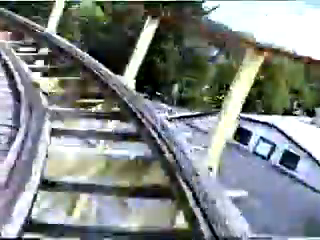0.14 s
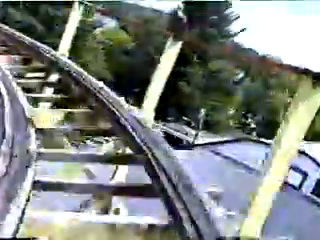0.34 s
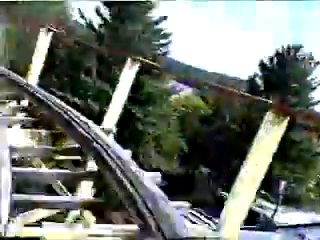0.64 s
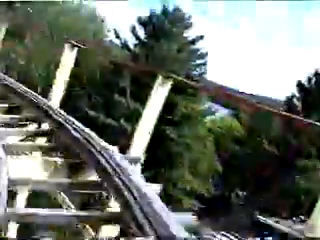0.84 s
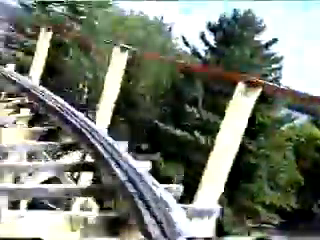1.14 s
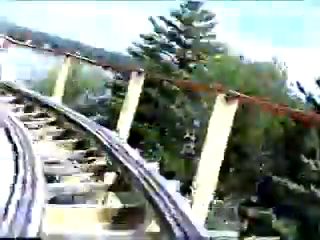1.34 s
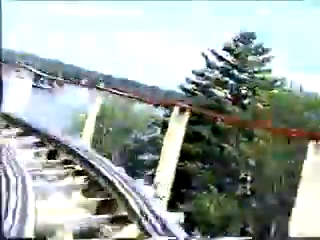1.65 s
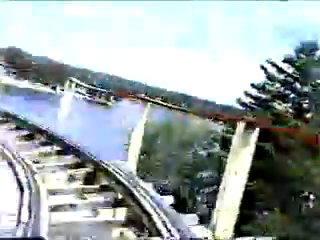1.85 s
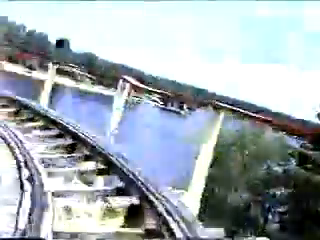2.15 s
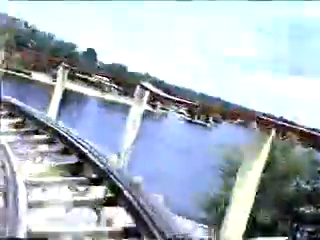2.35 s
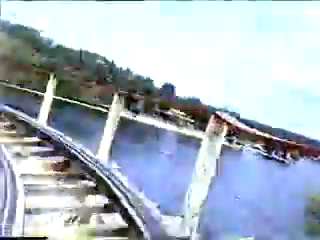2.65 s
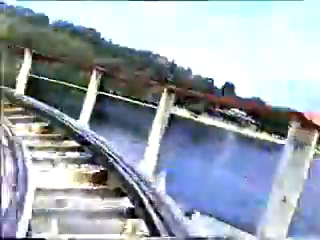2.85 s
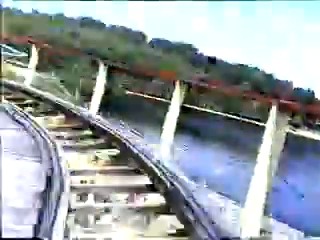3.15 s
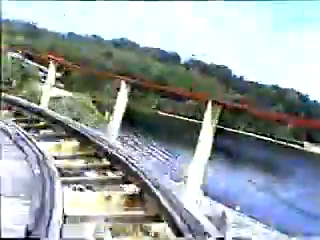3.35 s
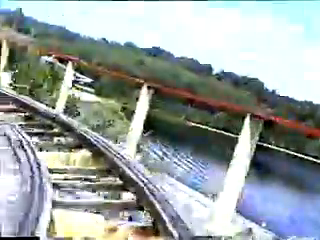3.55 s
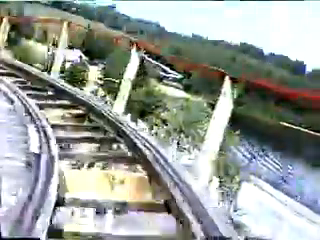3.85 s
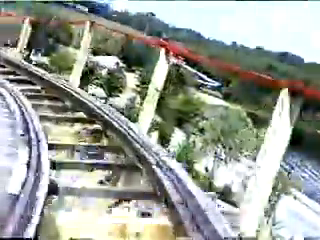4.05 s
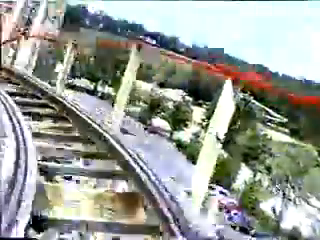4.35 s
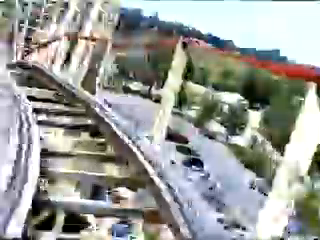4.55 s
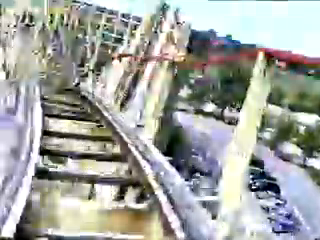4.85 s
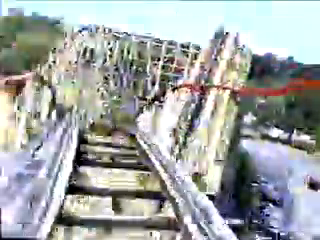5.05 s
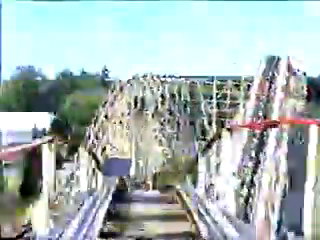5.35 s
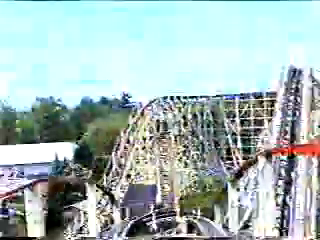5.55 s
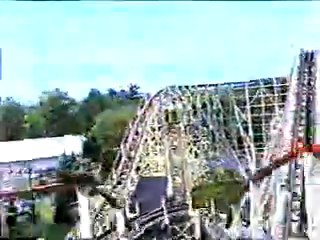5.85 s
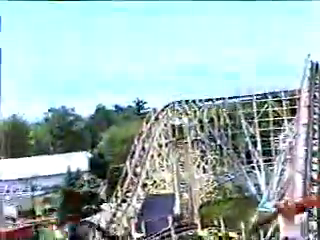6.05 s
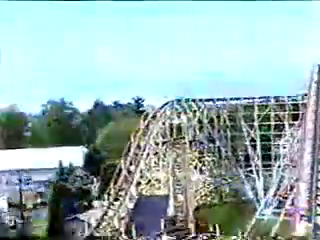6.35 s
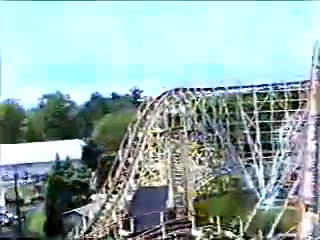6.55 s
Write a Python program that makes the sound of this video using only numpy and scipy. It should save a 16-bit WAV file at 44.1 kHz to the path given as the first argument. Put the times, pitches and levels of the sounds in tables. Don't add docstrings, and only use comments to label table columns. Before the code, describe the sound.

The ride is already in full motion at 0 s: steel wheels rumble roughly over wooden track, with hard, hollow jolts in the first half second and loose iron clanking above them. Around 1.2 s the rolling noise thins as the load lightens, and the ironwork rattles harder and brighter. By 1.8 s the fuller roar is back. From 2 to 4.3 s irregular bangs, quick rebounds and clacks keep coming, especially strong around 3.1 to 3.4 s, the roar dipping and surging. Jolts become sparser after about 4.5 s; at 5.0 to 5.3 s flanges give brief, unsteady falling whistles. The iron rattle eases near 5.5 s. Past 6 s knocks gather again, tightly around 6.4 to 6.6 s, and the roar swells to the abrupt end. A small onboard microphone gives a boxy, lightly saturated, dry sound with weak deep bass, dulled top, faint hiss and thin whines.

```python
import sys
import numpy as np
from scipy import signal
from scipy.fft import rfft, irfft, next_fast_len
from scipy.io import wavfile
from scipy.ndimage import uniform_filter1d, map_coordinates

SR = 44100
rng = np.random.default_rng(int(sys.argv[2]) if len(sys.argv) > 2 else 0)


def digitize_waveform(pressure):
    field = np.atleast_2d(pressure).T
    bounded = np.clip(field, -1, 1)
    quanta = np.round(bounded * 32767).astype(np.int16)
    wavfile.write(sys.argv[1], SR, quanta)


def amplitude_ratio(level_db):
    exponent = np.asarray(level_db, float) / 20
    return 10 ** exponent


N = 295029

# time in seconds, peak in dB, main ring in Hz, bright part in dB.
JOLTS = [(0.102, -9, 598, -17), (0.17, 0.5, 686, -17), (0.269, -7.5, 587, -20), (0.334, 1.5, 567, -11),
         (0.432, -7, 736, -8), (0.496, -4.5, 744, -22), (0.701, -7, 292, -1), (0.835, -3.5, 767, -10),
         (0.974, 0.5, 766, -26), (1.123, -2, 784, -8), (1.312, -6, 644, -30), (1.481, -3, 549, -18),
         (1.669, -1, 735, -36), (2.005, -6.5, 443, -6), (2.165, -6, 764, -7.5), (2.317, -4.5, 697, -27),
         (2.472, -4, 707, -11.5), (2.724, -1, 625, -13), (3.068, -2, 376, -12.5), (3.139, 3, 607, -19),
         (3.272, -2, 382, -28), (3.401, 3.5, 607, -18), (3.641, 1, 710, -24), (3.771, -2, 767, -24),
         (4.039, -1.5, 440, -14), (4.179, -4, 752, -3), (4.827, -3.5, 445, -7), (6.009, -2.5, 813, -9),
         (6.408, -1, 362, -8), (6.611, -1.5, 686, -10)]
# time in seconds, peak in dB, main ring in
# Hz, bright part in dB.
MORE_JOLTS = [(0.19, -5.5, 310, -16.5), (0.569, -10.5, 730, -17), (0.674, -7, 735, -26),
              (0.93, -13, 897, -21), (1.014, -6, 386, -0.5), (1.029, -1.5, 790, -16), (1.535, -7.5, 677, -9),
              (1.739, -5, 554, -11), (1.916, -10, 562, -5.5), (2.368, -1.5, 625, -32),
              (2.764, -7, 586, -24.5), (2.798, -2, 822, -14), (2.888, -2, 317, -21), (2.977, -5.5, 353, -9),
              (3.342, -3.5, 759, -23), (3.499, -5, 684, -21), (3.809, -7.5, 648, -1), (3.952, -9, 620, 1.5),
              (4.128, -4.5, 715, -6), (4.217, -5.5, 589, -29), (4.302, -8, 708, -21), (4.527, -5, 743, -7),
              (5.44, -3, 703, -17), (5.51, -11, 376, -1), (5.61, -7, 377, -2.5), (6.095, -2, 411, -28),
              (6.174, -12, 673, -1), (6.447, -0.5, 356, -12.5), (6.469, 0.5, 800, -19.5),
              (6.54, -2.5, 747, -11.5)]
# frequency in Hz, density in dB per Hz.
BODY_COLOUR = [(200, -48), (400, -5.5), (500, -0.5), (620, 1.5), (700, -0.5), (750, 2), (820, -0.5),
               (1000, -2.5), (1300, -6), (1600, -25), (2600, -73.5)]
# frequency in Hz, density in dB per Hz.
UPPER_COLOUR = [(700, -60), (1200, -4.5), (1400, -0.5), (1600, -4), (1800, -4), (2100, -8.5), (2400, -14),
                (2740, -27), (3300, -56)]
# frequency in Hz, density in dB per Hz.
IRON_COLOUR = [(2200, -39.5), (2740, -13), (3080, 0.5), (3170, 4), (3280, 3), (3900, 3), (4400, -1),
               (5000, -9.5), (5600, -22), (7000, -23.5), (8000, -58)]


def unit(x):
    return x / np.sqrt(np.mean(x ** 2) + 1e-20)


def along(points, hz):
    point_hz, value = np.transpose(points)
    return np.interp(np.log(hz + 1), np.log(point_hz + 1), value)


def curves(rows):
    s, *columns = np.transpose(rows)
    return [np.interp(np.arange(N) / SR, s, column) for column in columns]


def wobble(knots_per_s):
    knots = rng.standard_normal(int(N * knots_per_s / SR) + 4)
    return map_coordinates(knots, [np.arange(N) * knots_per_s / SR])


def coloured(x, spectrum):
    m = next_fast_len(x.shape[-1] + 8192)
    gain = amplitude_ratio(along(spectrum, np.fft.rfftfreq(m, 1 / SR)))
    cepstrum = irfft(np.log(gain + 1e-6), m)
    cepstrum[1:m // 2] *= 2
    cepstrum[m // 2 + 1:] = 0
    return irfft(rfft(x, m) * np.exp(rfft(cepstrum)), m)[..., :x.shape[-1]]


def burst(envelope, colour):
    click = coloured(np.eye(1, 4096)[0], colour)
    noise = envelope[:N] * rng.standard_normal(N)
    return signal.fftconvolve(noise, click / np.linalg.norm(click))[:N]


def decay(t, t60_s, rise_s):
    return amplitude_ratio(-60 * t / t60_s) * (1 - np.exp(-t / rise_s))


def chance(per_s, level_db, spread_db):
    draw = rng.standard_normal((int(N / SR * per_s), 4))
    s = (np.arange(len(draw)) + .5 + .5 * np.tanh(draw[:, 0])) / per_s
    s = np.clip(s, 0, (N - 1) / SR)
    return np.c_[s, level_db[(s * SR).astype(int)] + spread_db * draw[:, 1], draw[:, 2:]]


def ride():
    # time in seconds, wheel load in dB, looseness of the ironwork in dB.
    course = [(0.0, -20.5, 0.5), (0.3, -22.5, 0.5), (0.61, -22, 0.8), (1.18, -29, 1.5), (1.23, -27, 5),
              (1.36, -26.5, 2.5), (1.82, -20.5, 1), (2.43, -21.5, -0.6), (3.04, -21, 1), (3.42, -18.5, 0),
              (3.65, -20, 2.2), (4.26, -19, 1), (4.87, -20.5, -0.1), (5.47, -20, -4.5), (6.08, -22, -0.1),
              (6.4, -20, -0.5), (6.65, -19.5, -1), (6.69, -13.5, -11.5)]
    # time in seconds, half length in seconds, load change in dB, looseness change in dB.
    bounces = [(0.162, 0.014, 4, 2.5), (0.534, 0.026, -3, -1.7), (0.698, 0.035, 2.3, -1),
               (0.785, 0.026, -0.3, -3.5), (0.863, 0.017, 7, 0), (1.007, 0.071, 7.5, -1.5),
               (1.134, 0.01, 3.5, 7), (1.474, 0.035, 1, 4.5), (1.615, 0.03, -0.5, -2),
               (2.068, 0.047, -4, 2), (2.483, 0.055, 2.5, 3.5), (2.607, 0.035, -4.5, 1.5),
               (2.918, 0.016, -1.6, -1), (3.2, 0.024, -1, -1), (3.572, 0.045, -4.5, 0),
               (3.732, 0.015, -3, 0.5), (3.867, 0.025, -2, 0), (4.023, 0.026, -3, 0),
               (4.26, 0.02, -5.5, 1.5), (4.43, 0.099, -4, -2), (4.594, 0.03, -2, 1.5),
               (4.792, 0.022, -0.5, -1.6), (4.935, 0.024, 2, -5.5), (5.113, 0.054, 3, 1.9),
               (5.363, 0.026, -5, 1.8), (5.612, 0.014, 5, -1.5), (5.691, 0.025, -4, -3),
               (5.82, 0.044, -3, -4.5), (6.294, 0.073, -1.0, -6.5), (6.45, 0.019, -0.5, 1.5)]
    t = np.arange(N) / SR
    load_db, loose_db = curves(course)
    for s, half_s, press_db, shake_db in bounces:
        bell = np.exp(-.5 * ((t - s) / half_s) ** 2)
        load_db = load_db + press_db * bell
        loose_db = loose_db + shake_db * bell
    return load_db, loose_db


def tape():
    # frequency in Hz, density in dB per Hz.
    hiss_colour = [(20, 18.5), (100, 18.5), (400, 5), (5000, -1.5), (5600, 5), (6900, 1), (7300, -2),
                   (7700, -10), (8300, -8), (8800, -5), (9100, -8.5), (9550, -1), (9750, -17),
                   (10200, -59.5)]
    # frequency in Hz, level in dB.
    whines = [(5514, -80), (5755, -76), (6473, -78.5), (6953, -76.5), (7192, -90), (7994, -91.5),
              (8269, -96), (8807, -81), (9647, -98)]
    t = np.arange(N) / SR
    whine = sum(amplitude_ratio(db - 1.0) * np.sin(2 * np.pi * (hz * t + .05 * wobble(6))) for hz, db in whines)
    hiss = unit(coloured(rng.standard_normal(N), hiss_colour))
    return amplitude_ratio(-54.0) * hiss + whine


def squeal():
    # time in seconds, pitch in Hz, level in dB.
    whistles = [
        [(5.0, 1090, -22), (5.05, 1132, -24), (5.1, 939, -23), (5.17, 613, -30)],
        [(5.13, 1082, -18), (5.2, 1010, -25), (5.26, 957, -18.5)],
    ]
    t, out = np.arange(N) / SR, 0
    for rows in whistles:
        hz, db = curves(rows)
        fade_in = np.clip((t - rows[0][0]) / 0.013, 0, 1)
        fade_out = np.clip((rows[-1][0] - t) / 0.0059, 0, 1)
        level = fade_in * fade_out * amplitude_ratio(db + 1.4 * wobble(30))
        cycles = np.cumsum(hz * (1 + 0.00834 * wobble(40))) / SR
        out = out + level * np.sin(2 * np.pi * cycles)
    return out


def clanks():
    # time in seconds, peak in dB.
    hard = [(0.014, -26), (0.13, -25), (0.333, -20), (0.428, -18.5), (0.6295, -18), (0.659, -20.5),
            (0.696, -21), (0.931, -23), (1.018, -17), (1.129, -19), (1.405, -25.5), (1.468, -22.5),
            (1.537, -19), (2.003, -21), (2.136, -20.5), (2.479, -32), (2.7655, -23.5), (3.085, -19),
            (3.1325, -16), (3.648, -31), (3.737, -21), (3.8155, -17), (4.1855, -21), (4.5345, -19),
            (4.644, -27), (4.718, -20.5), (4.825, -24), (5.605, -21), (6.009, -20), (6.448, -20.5)]
    ticks = chance(9, sum(ride()) - 7.5, spread_db=5)
    t = np.arange(SR // 8) / SR
    clack = np.zeros(N + SR)
    for s, db, *_ in hard + list(ticks):
        fall = amplitude_ratio(db - 7.0) * decay(t, t60_s=0.042, rise_s=0.0018)
        again_s = s + rng.uniform(.006, .02)
        clack[round(s * SR):][:len(t)] += fall
        clack[round(again_s * SR):][:len(t)] += 0.29 * fall
    return burst(clack, IRON_COLOUR)


def struck(t, hz, spread, t60_s, rise_s, count):
    draw = rng.standard_normal((count, 3))
    detune = np.clip(draw[:, :1], -2, 1.4) * (np.arange(count)[:, None] > 0)
    pitch_hz = hz * np.exp(spread * detune)
    ring = amplitude_ratio(2.6 * draw[:, 1:2]) * np.sin(2 * np.pi * (pitch_hz * t + 0.1 * draw[:, 2:]))
    ring[0] *= 1.8
    return ring.sum(0) / count ** 0.6 * decay(t, t60_s, rise_s)


def jolts():
    t = np.arange(SR // 5) / SR
    fall = decay(t, t60_s=0.055, rise_s=0.00096)
    ring, puff, crack = np.zeros((3, N + SR))
    joints = [(s, db, 549 * np.exp(.3 * np.tanh(a)), -17 + 5 * b)
              for s, db, a, b in chance(7, ride()[0] + 11, spread_db=2)]
    for s, db, hz, bright_db in JOLTS + MORE_JOLTS + joints:
        at = round(s * SR)
        panels = struck(t, hz, spread=0.39, t60_s=0.085, rise_s=0.00065, count=7)
        ring[at:][:len(t)] += amplitude_ratio(db - 4.5) * panels
        puff[at:][:len(t)] += amplitude_ratio(db - 9.5) * fall
        crack[at:][:len(t)] += amplitude_ratio(db + bright_db - 7.5) * fall
    thin = [(60, -56.5), (100, -39), (160, -16.5), (250, -4), (320, -3.5), (1500, -3.5),
            (2700, -26.5), (6000, -62.5)]
    return coloured(ring[:N], thin) + burst(puff, BODY_COLOUR) + burst(crack, UPPER_COLOUR)


def shudder():
    blows, t = np.zeros(N), np.arange(SR // 4) / SR
    for s, db, *_ in JOLTS + MORE_JOLTS:
        blows[round(s * SR)] = amplitude_ratio(db)
    return signal.fftconvolve(blows, decay(t, t60_s=0.07, rise_s=0.0074))[:N]


def lift():
    t, dip = np.arange(N) / SR, np.zeros(N)
    for s, *_ in JOLTS + MORE_JOLTS:
        dip = np.maximum(dip, (t < s) * np.exp(-np.abs(t - s) / 0.013))
    return amplitude_ratio(-1.5 * dip)


def bumps(per_s, spread_db, t60_s):
    hit = rng.random(N) < per_s / SR
    size = amplitude_ratio(spread_db * rng.standard_normal(N))
    t = np.arange(SR // 8) / SR
    return unit(signal.fftconvolve(hit * size, decay(t, t60_s, rise_s=0.0027))[:N])


def roar(spectrum, shake, patchy_db):
    z = signal.stft(rng.standard_normal(N) * shake, nperseg=1024)[2]
    field = uniform_filter1d(rng.standard_normal(z.shape), 3, 0)
    field = uniform_filter1d(field, 4, 1)
    patchy = signal.istft(z * amplitude_ratio(patchy_db * unit(field)), nperseg=1024)[1][:N]
    return unit(coloured(patchy, spectrum))


def wheels():
    # frequency in Hz, density in dB per Hz.
    rumble_colour = [(60, -66), (98, -28), (160, -15.5), (245, -5), (300, -0.5), (420, -2), (600, -17.5),
                     (1200, -63)]
    load_db, loose_db = ride()
    knocks = bumps(130, spread_db=0.5, t60_s=0.041)
    after = shudder()
    sway = wobble(15)
    mean_db = load_db.mean()

    rumble_db = mean_db + 0.7 * (load_db - mean_db) - 0.22 * loose_db - 3 + 0.13 * sway
    body_db = load_db + 0.5 + 0.22 * sway
    upper_db = load_db + 0.9 * loose_db - 9 + 0.15 * sway
    iron_db = load_db + 1.14 * loose_db - 20 + 0.33 * sway + 0.94 * wobble(16)

    chatter = 1 + 1.1 * knocks + 0.29 * bumps(40, spread_db=1.5, t60_s=0.027)
    rumble = amplitude_ratio(rumble_db) * roar(rumble_colour, 1 + 0.081 * knocks, patchy_db=3.0)
    body = amplitude_ratio(body_db) * roar(BODY_COLOUR, 1 + 0.31 * knocks, patchy_db=0.7)
    upper = amplitude_ratio(upper_db) * roar(UPPER_COLOUR, 1 + 0.68 * knocks, patchy_db=1.5)
    iron = amplitude_ratio(iron_db) * roar(IRON_COLOUR, chatter, patchy_db=2.0)
    low = (rumble + body) * (1 + 0.6 * after)
    high = (upper + iron) * (1 + 0.63 * after)
    return lift() * (low + high)


def scene():
    car = wheels() + jolts() + clanks() + squeal()
    return np.array([car, car])


def channel_noise(mid):
    # frequency in Hz, side noise over the sound in dB.
    side_colour = [(40, -33), (70, -25.5), (100, -31), (160, -31), (260, -42.5), (400, -58.5), (680, -31.5),
                   (1110, -22), (1810, -18.5), (2300, -16), (2750, -12), (3200, -14.5), (4800, -11),
                   (9500, -6)]
    hz, t, z = signal.stft(mid, SR, nperseg=1024)
    power = uniform_filter1d(uniform_filter1d(np.abs(z) ** 2, 15, 0), 3, 1)
    level = np.sqrt(np.abs(power))
    gain = level * amplitude_ratio(along(side_colour, hz)[:, None] + 1.5 * rng.standard_normal(len(t)))
    noise = signal.stft(rng.standard_normal(N), SR, nperseg=1024)[2]
    side = noise / np.sqrt(np.mean(np.abs(noise) ** 2)) * gain

    bands = [(7600, 8300, .95), (8300, 9050, .88), (9050, 9600, .24), (9600, 22000, .15)]
    luck = np.repeat(rng.random((4, len(t))), 3, axis=1)[:, :len(t)]
    kept = np.ones(z.shape)
    for (low_hz, high_hz, share), row in zip(bands, luck):
        kept[(hz >= low_hz) & (hz < high_hz)] = row < share
    return signal.istft(kept * np.array([z + side, z - side]), SR, nperseg=1024)[1][:, :N]


def top_cut(x):
    return signal.sosfilt(signal.butter(12, 9800, fs=SR, output="sos"), x)


def record(dry):
    mid = dry[0] / (1 + np.abs(dry[0] / .88) ** 4) ** (1 / 4)
    losses = [(40, -30), (90, -9), (130, 0), (6500, 0), (8000, -15)]  # (Hz, dB)
    mid = coloured(mid, losses) + tape()
    return top_cut(channel_noise(mid))


dry = scene()
out = record(dry)
digitize_waveform(out)
```